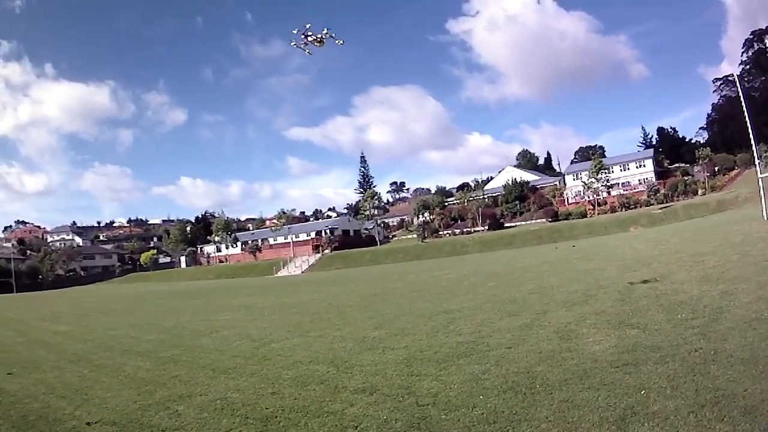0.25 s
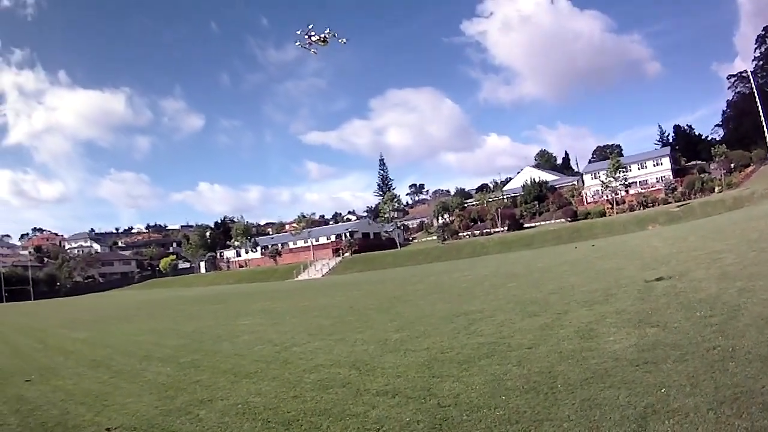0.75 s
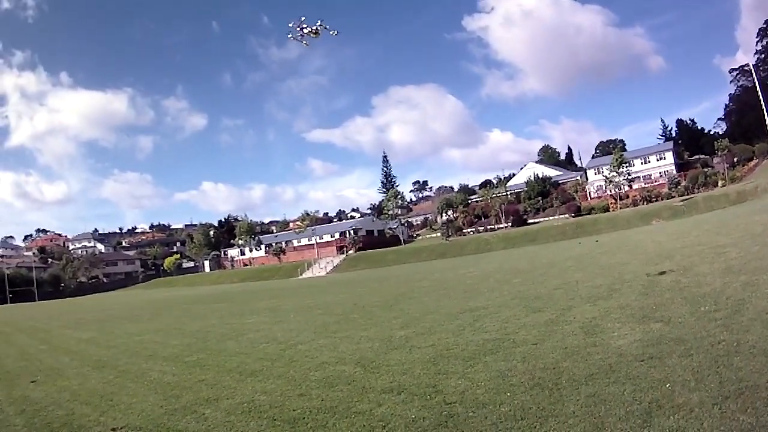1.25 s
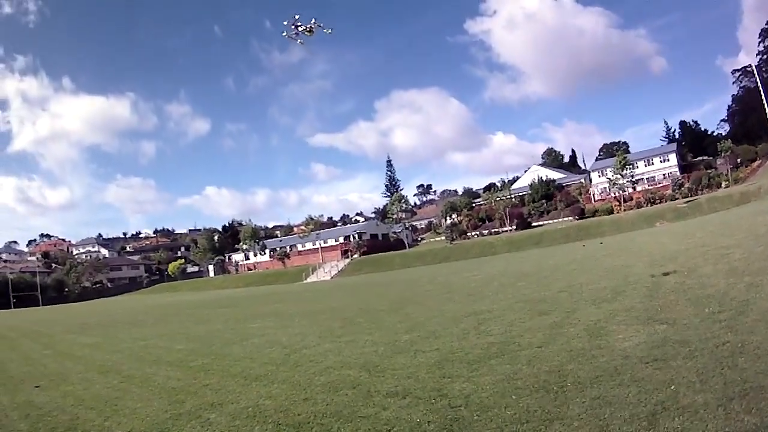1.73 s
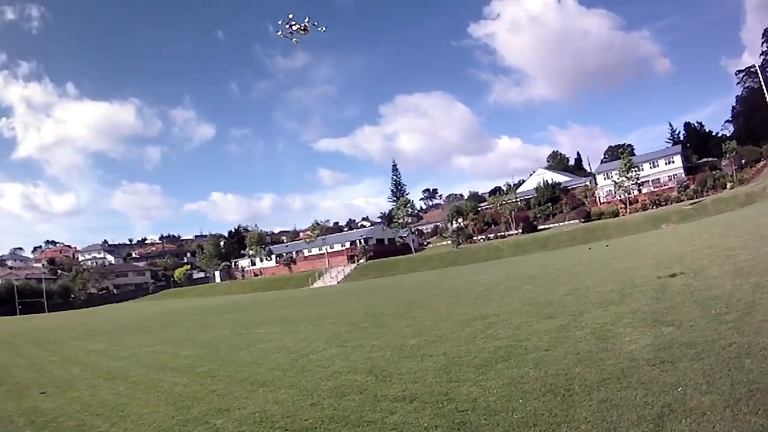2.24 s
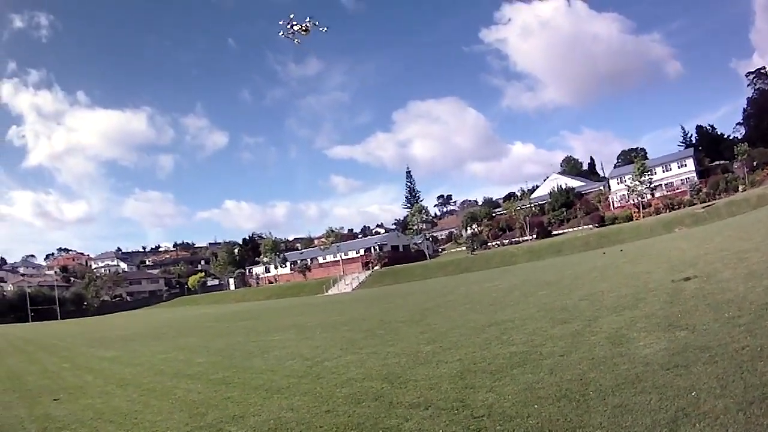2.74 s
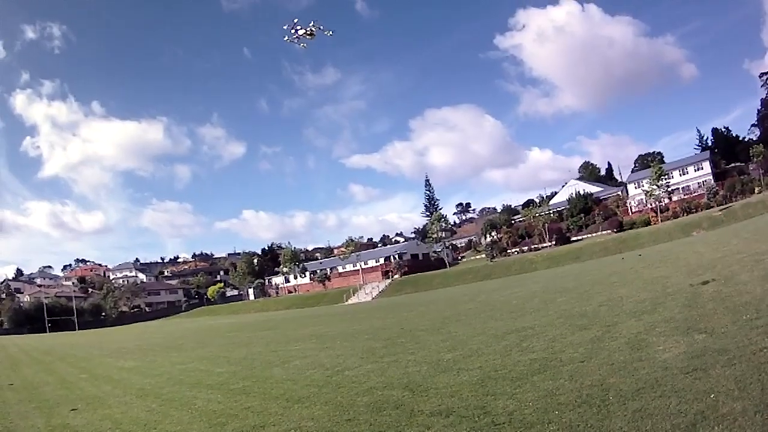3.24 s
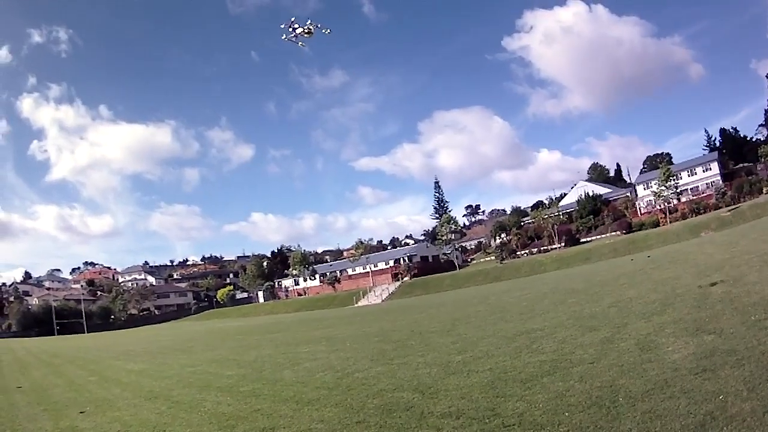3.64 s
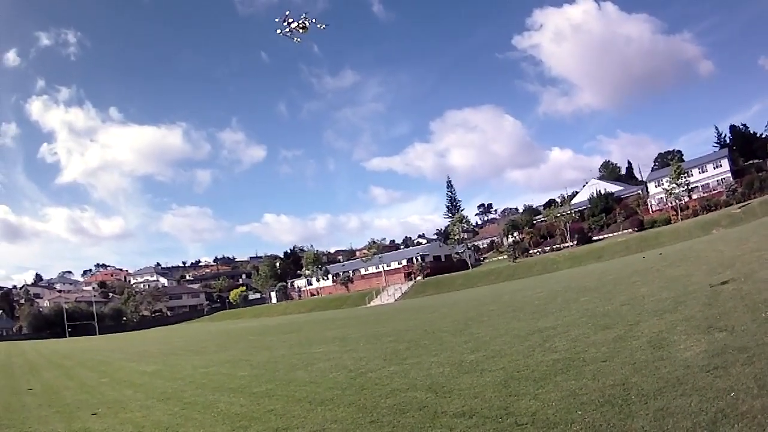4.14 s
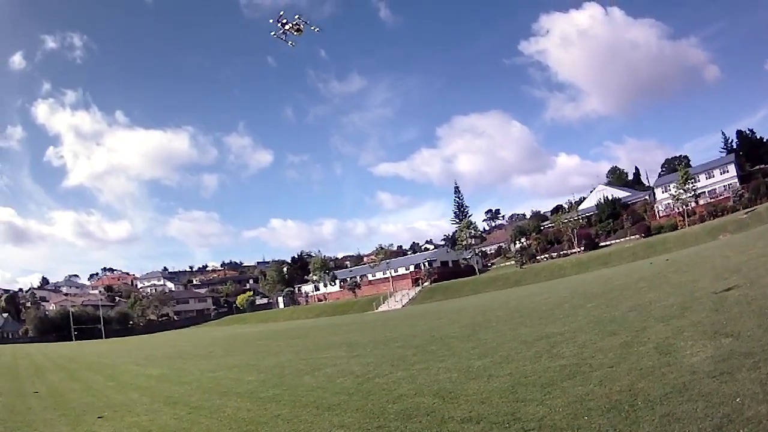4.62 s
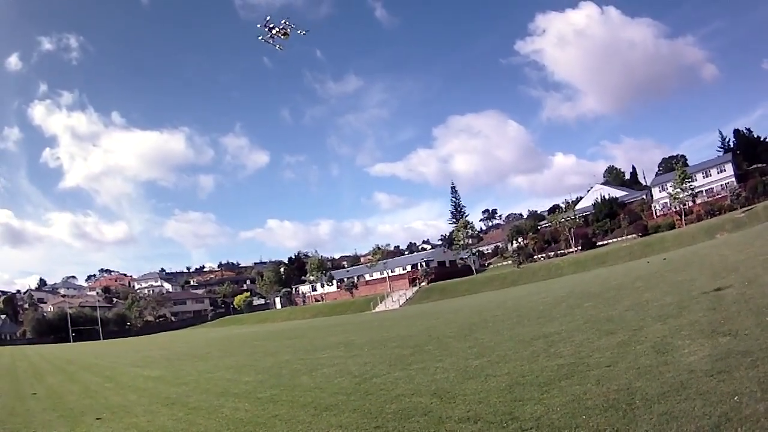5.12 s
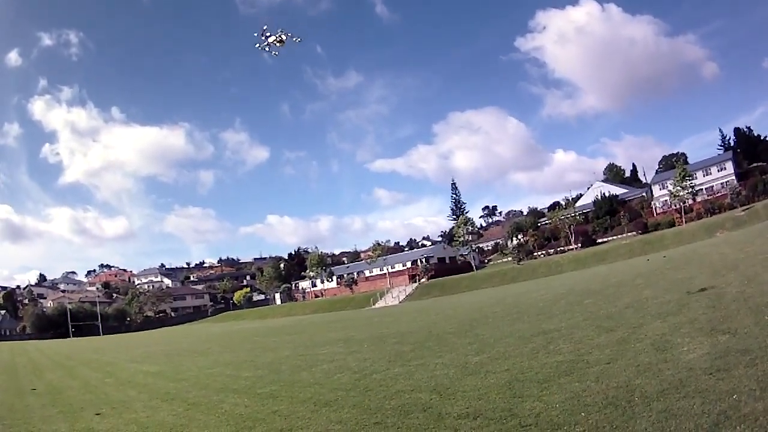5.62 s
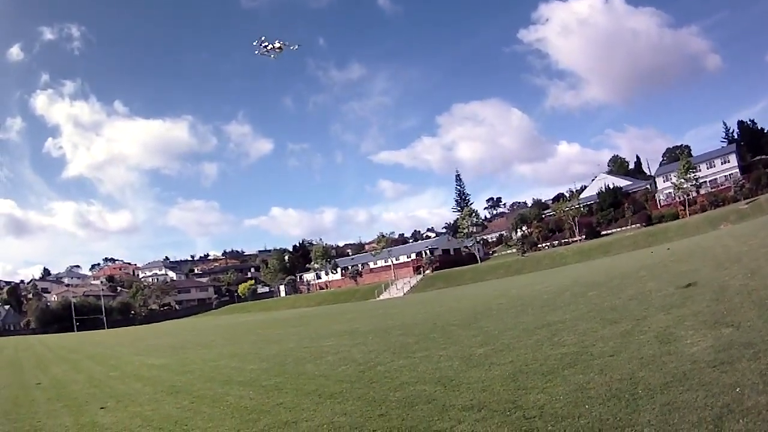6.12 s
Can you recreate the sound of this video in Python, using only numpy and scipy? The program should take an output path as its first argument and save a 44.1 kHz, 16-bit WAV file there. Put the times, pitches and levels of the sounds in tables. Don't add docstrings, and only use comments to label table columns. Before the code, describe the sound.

A small multirotor hovers over an open lawn, its four electric rotors buzzing continuously with slightly different pitches that beat and waver. A bright, resonant hiss rides over the hum. The right channel carries the craft; the left has only a dull, faint leak, bassy circuit hiss and four low thumps, three in the first half and one near the end. Cheap camera microphone, dry outdoors.

```python
import sys
import numpy as np
from scipy import signal
from scipy.fft import rfft, irfft, next_fast_len
from scipy.io import wavfile

SR = 44100
rng = np.random.default_rng(int(sys.argv[2]) if len(sys.argv) > 2 else 0)


def amp(db):
    return 10 ** (np.asarray(db, float) / 20)


def write(x):
    x = np.atleast_2d(x).T
    wavfile.write(sys.argv[1], SR, np.round(np.clip(x, -1, 1) * 32767).astype(np.int16))


N = 280917

# time_s, mean_blade_rate_hz, rotor_speed_spread (0-2, from leaning), hiss_db
HOVER = [(0, 210.6, 1.1, -49.5), (.55, 211.2, .85, -49.5), (.9, 211.8, .6, -49.5), (1.2, 209.2, 1.036, -49),
         (1.75, 212.2, 1.36, -49.5), (2.05, 209.1, 1.0, -48.5), (2.6, 210.5, 1.13, -49.5),
         (3.2, 210.3, 0.66, -49.5), (3.5, 210.8, 0.59, -49.5), (4.1, 209.3, .9, -49.5),
         (4.45, 210, .9, -49), (5.1, 207.5, 1.0, -50.5), (5.5, 209.3, .9, -50.5), (6.37, 208.5, 1.0, -50.5)]
ROTOR_LEAN_HZ = [6.5, 2.0, -2.5, -7.0]
ROTOR_DB = [-10, -4.5, -6.5, -14]


def drone():
    mean_hz, spread, hiss_db = in_time(HOVER)
    tones, hiss = 0, 0
    for lean_hz, rotor_db in zip(ROTOR_LEAN_HZ, ROTOR_DB):
        blade_hz = (mean_hz + spread * lean_hz) * (1 + 0.004 * drift(3.0))
        turn = 2 * np.pi * (np.cumsum(blade_hz) / SR + rng.random())
        tones += blade_tones(turn, rotor_db, hiss_db)
        hiss += chopped_hiss(turn)
    return tones + amp(hiss_db + 6) * case_hiss(hiss)


# multiple_of_blade_rate, level_db, bearing_group (row of BEARING)
BLADE_ORDERS = [(1, -16, 0.5), (2, -3.5, 1), (3, -5.5, 0), (4, -3.5, 2), (5, -12.5, 2), (6, -4.5, 2),
                (7, 2.5, 2.2), (8, -7.5, 2), (14, -1, 2), (15, -5.5, 2), (22, -1, 2), (50, -12, 2),
                (10, -7, 2.6)]
# start_db (over the hiss), slope_db_per_s, until_s
BEARING = [
    (2.5, -1.42, 4.0),
    (-12.5, 1.82, 4.36),
    (-6.5, -0.61, 4.5),
]


def blade_tones(turn, rotor_db, hiss_db):
    seconds = np.arange(N) / SR
    bearing_gain = []
    for start_db, slope, until in BEARING:
        bearing_gain.append(amp(hiss_db + start_db + slope * np.minimum(seconds, until)))
    fading = [amp(rotor_db + 4.0 * drift(4.0)) for _ in range(3)]
    tones = 0
    for k, (multiple, db, group) in enumerate(BLADE_ORDERS):
        gain = fading[k % 3] * amp(db) * bearing_gain[int(group)]
        tones += gain * np.sin(round(multiple) * turn + 6 * rng.random())
    return tones


def chopped_hiss(turn):
    chop_db = 6.2 * 0.35 * np.cos(turn)
    gust_db = 0.2 * drift(25) + 1.3 * drift(130)
    return rng.standard_normal(N) * amp(chop_db + gust_db)


# frequency_hz, density_db (per Hz)
HISS = [(30, -27), (120, -15), (300, -12.5), (900, -9), (1300, -6.5), (2600, -10), (4200, -12.5),
        (6000, -18.5), (9500, -21.5), (11500, -26.5), (13500, -25), (14600, -23)]
# centre_hz, width_hz, lift_db
CASE = [(1412, 214, 2.5), (3182, 298, 10), (3718, 480, 7), (4640, 427, 7), (5520, 240, 4.5), (6514, 280, 5),
        (7383, 450, 9.5), (8114, 270, 8.5), (8756, 603, 11.5), (10250, 980, 2.5), (15230, 420, 9)]


def case_hiss(hiss):
    highpass = signal.butter(2, 3300, "high", fs=SR, output="sos")
    treble = signal.sosfiltfilt(highpass, hiss)
    flutter = amp(0.64 * drift(12.0) + 0.71 * drift(200))
    return coloured(hiss + treble * (flutter - 1), HISS, CASE)


def crosstalk(craft):
    return amp(-13.5) * signal.filtfilt(*signal.butter(1, 9100, fs=SR), craft)


def stray_hiss():
    return amp(-60) * coloured(rng.standard_normal(N), HISS, CASE)


# frequency_hz, density_db (per Hz)
CIRCUIT = [(30, 1.5), (300, 0), (1000, -3), (3000, -10.5), (6000, -20.5), (10000, -20.5), (15000, -26)]


def circuit_noise():
    return amp(-56) * coloured(rng.standard_normal(N), CIRCUIT)


def in_time(rows):
    s, *columns = np.transpose(rows)
    return [np.interp(np.arange(N) / SR, s, c) for c in columns]


def drift(rate):
    pole = np.exp(-80 * np.pi * rate / SR)
    noise = rng.standard_normal(N // 40 + 2002)
    slow = signal.lfilter([1], [1, -2 * pole, pole * pole], noise)[2000:]
    return np.interp(np.arange(N) / 40, np.arange(len(slow)), rms_one(slow - slow.mean()))


def rms_one(x):
    return x / np.sqrt(np.mean(x ** 2) + 1e-20)


def at_hz(points, hz):
    frequency_hz, level_db = np.transpose(points)
    return np.interp(np.log(hz), np.log(frequency_hz), level_db)


TOP_HZ = 15340


def coloured(x, spectrum, bumps=()):
    size = next_fast_len(N)
    hz = np.arange(size // 2 + 1) * SR / size + 1
    shape_db = at_hz(spectrum, hz)
    for centre, width, lift_db in bumps:
        shape_db = shape_db + lift_db * np.exp(-2 * ((hz - centre) / width) ** 2)
    shape_db -= np.interp(hz, TOP_HZ + np.array([0, 15, 130, 160]), [0, 24, 30, 80])
    return rms_one(irfft(rfft(x, size) * amp(shape_db), size)[:N])


def scene():
    craft = drone()
    left = crosstalk(craft) + stray_hiss() + circuit_noise()
    return np.array([left, craft])


CAMERA_SR, HOP, GRID = 48000, 1024, 504
TOP_LINE = 656
# frequency_hz, step_db
STEP = [(100, -22), (1000, -23), (4700, -24), (7000, -27), (12000, -29), (15000, -28)]
# from_block, step_db
OFFSET_STEP = [
    (-2, 21.07),
    (0, 22.58),
    (58, 21.07),
    (174, 22.58),
    (214, 21.07),
]
# start_s, length_s
BASS_GAPS = [(.03, .1), (.2, .18), (.62, .18), (1.03, .12), (1.29, .07), (1.54, .12), (1.75, .21),
             (2.12, .1), (2.43, .25), (3.49, .1), (3.94, .23), (4.93, .35), (5.42, .12), (5.66, .25),
             (6.0, .23)]


def rounding_steps(blocks):
    line_hz = (np.arange(TOP_LINE) + 0.5) * CAMERA_SR / 2 / HOP
    scatter_db = 2.0 * np.repeat(rng.standard_normal((2, len(blocks), TOP_LINE // 16)), 16, axis=2)
    steps = at_hz(STEP, line_hz) + scatter_db + [[[0]], [[-4]]]
    middle_s = ((blocks + 1) * HOP + GRID) / CAMERA_SR
    flickers = rng.random(len(blocks)) < 0.45
    empty_hz = rng.uniform(180, 310, len(blocks)) * flickers
    for start, length in BASS_GAPS:
        inside = (middle_s > start) & (middle_s < start + length + 0.02)
        empty_hz[inside] = rng.uniform(270, 335)
    steps[0][line_hz < empty_hz[:, None]] = 20
    since, offset_db = np.transpose(OFFSET_STEP)
    steps[0, :, 0] = offset_db[np.searchsorted(since, blocks, "right") - 1]
    return steps


def rounding(x, window, step_db):
    half, step = window.shape[-1] // 2, amp(step_db)
    line = np.arange(step.shape[-1]) + 0.5
    sample = np.arange(2 * half) + 0.5 + half / 2
    basis = np.cos(np.pi / half * np.outer(line, sample)).astype("f")
    lines = (x * window).astype("f") @ basis.T / step
    whole = np.sign(lines) * np.floor(np.abs(lines) ** 0.75 + 0.4054) ** (4 / 3)
    return ((whole - lines) * step).astype("f") @ basis * window * 2 / half


# first_block, count_blocks, short_step_db,
# leaving_low_db (lines 0-3), leaving_next_db (lines 4-7)
SWITCHES = [
    (24, 2, 15.42, 24.08, 16.55),
    (65, 3, 18.43, 24.08, 14.8),
    (108, 1, 18.43, 22.6, 14.8),
    (249, 1, 18.43, 22.6, 14.8),
]
ENTER_STEPS = [21.07, 10.54, 10.54, 6.02, 0]
LEAVE_STEPS = [12.04, 3.01, -6]


def camera_blocks(dry):
    offset = np.array([[0.448], [0]])
    x = np.pad(signal.resample_poly(dry, 160, 147, axis=1), [(0, 0), (3 * HOP,) * 2]) + offset
    blocks = np.arange(-2, x.shape[1] // HOP - 5)
    starts = (blocks + 3) * HOP + GRID
    long, short = (np.sin(np.pi * (np.arange(n) + 0.5) / n) for n in (2048, 256))
    entering = np.r_[long[:HOP], np.ones(448), short[128:], np.zeros(448)]
    windows = np.tile(long, (len(blocks), 1))
    steps = rounding_steps(blocks)
    error = np.zeros(x.shape)
    for first, count, short_db, low_db, next_db in SWITCHES:
        k = first + 2
        after = k + count
        windows[k - 1], windows[k:after], windows[after] = entering, 0, entering[::-1]
        steps[0, k - 1, :20] = np.repeat(ENTER_STEPS, 4)
        steps[0, after, :20] = np.repeat([low_db, next_db, *LEAVE_STEPS], 4)
        for i in starts[k] + 448 + 128 * np.arange(8 * count):
            error[0, i:i + 256] += rounding(x[0, i:i + 256], short, [short_db] * 4)
    changes = rounding(x[:, starts[:, None] + np.arange(2 * HOP)], windows, steps)
    for k, i in enumerate(starts):
        error[:, i:i + 2 * HOP] += changes[:, k]
    rounded = signal.resample_poly(x - offset + error, 147, 160, axis=1)
    lead = round(3 * HOP * 147 / 160)
    return offset + rounded[:, lead:][:, :N]


def top_cut(x):
    return signal.sosfilt(signal.butter(12, 15840, fs=SR, output="sos"), x)


def record(dry):
    mix = camera_blocks(dry)
    return top_cut(mix)


dry = scene()
out = record(dry)
write(out)
```